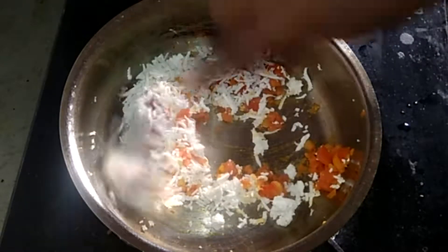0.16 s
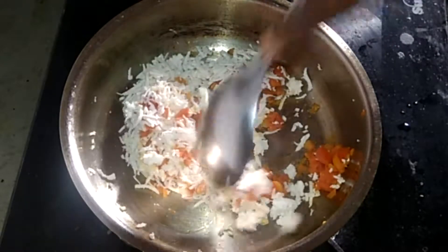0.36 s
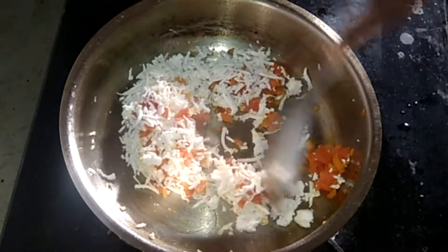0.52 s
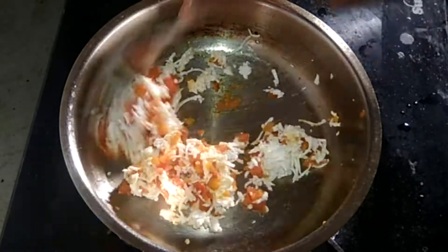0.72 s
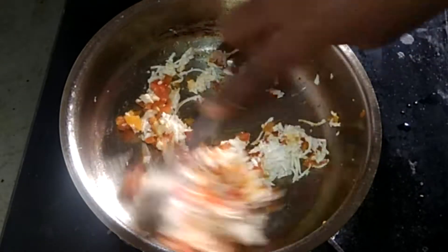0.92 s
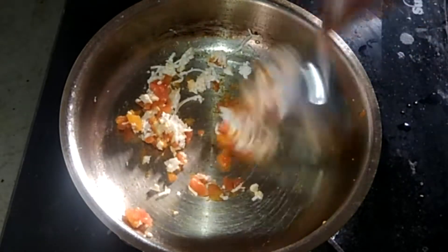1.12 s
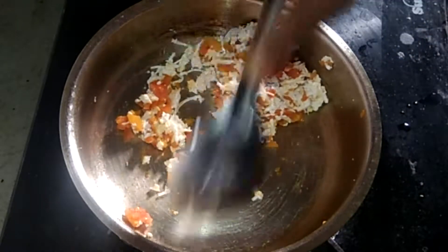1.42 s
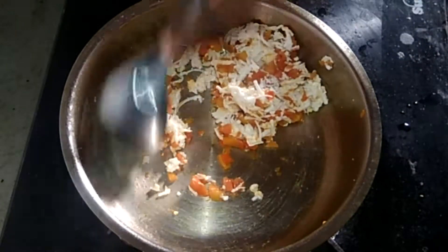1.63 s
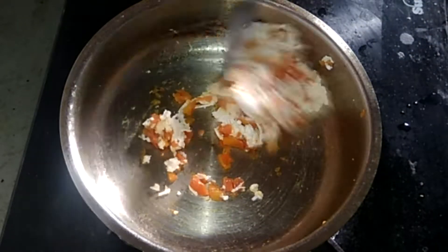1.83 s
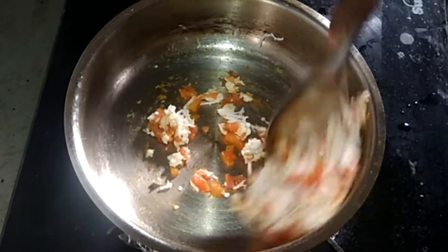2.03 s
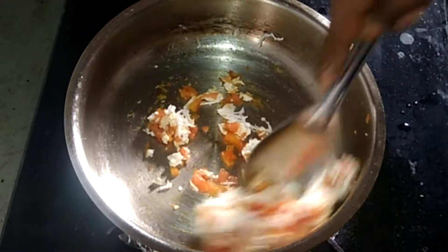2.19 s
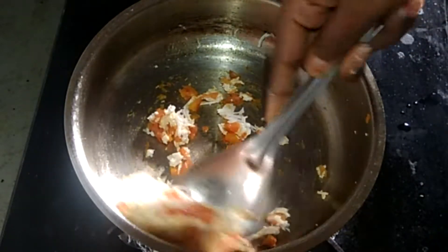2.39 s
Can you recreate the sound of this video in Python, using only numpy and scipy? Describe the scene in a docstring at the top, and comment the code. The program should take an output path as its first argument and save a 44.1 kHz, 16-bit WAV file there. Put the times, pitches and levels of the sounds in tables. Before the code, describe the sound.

Quick metallic scraping and clanking of a spoon stirring food in a steel pan, close up

```python
"""Over a quiet kitchen and a low rumble, a fine hiss on the left (noise and tiny clicks) fades once food is spread.
From 0.2 s a steel spoon strikes and scrapes the floor of a stainless pan in quick strokes, close under a stereo phone:
blows and gritty stick-slip clicks ring the pan's clear modes and its dense thicket of upper modes.
Last, soft wet grains and a dull hum as the food heap is pushed, while the room noise falls away."""
import sys
import numpy as np
from scipy import signal
from scipy.fft import rfft, irfft
from scipy.io import wavfile
from scipy.ndimage import uniform_filter1d

SR = 44100
rng = np.random.default_rng(int(sys.argv[2]) if len(sys.argv) > 2 else 0)


def dump(signal):
    """Clip the signal to [-1, 1] and save it as 16-bit WAV at the path in sys.argv[1]."""
    limited = np.clip(np.atleast_2d(signal).T, -1, 1)
    pcm = np.round(limited * 32767).astype(np.int16)
    wavfile.write(sys.argv[1], SR, pcm)


def ratio(d):
    """dB to gain"""
    e = np.asarray(d, float) / 20
    return 10 ** e


N = 112454

# likeness of the pan's two channels: (frequency [Hz], correlation [-1..1])
PAN_ALIKE = [(60, .7), (300, 1), (640, 0.64), (1400, 0.12), (5000, 0.02), (15000, -0.31)]
# stereo balance of the pan: (frequency [Hz], left over right [dB])
PAN_LR = [(200, 0), (700, -2), (1400, 1.5), (4400, -2.5), (8000, -4.5), (15000, 12.5)]


def at(table, hz):
    """Read (Hz, value) points on a log-frequency axis."""
    points = np.array(table, float)
    return np.interp(np.log(np.maximum(hz, 1)), np.log(points[:, 0]), points[:, 1])


def over_time(table, left=None):
    """Read (s, value) points at every sample."""
    return np.interp(np.arange(N) / SR, *np.array(table, float).T, left=left)


def unit(x):
    """Scale to rms 1."""
    return x / np.sqrt(np.mean(x ** 2))


def decay(t, t60_s):
    """Exponential fall of 60 dB in t60_s."""
    return np.exp(-np.log(1000) * t / t60_s)


def colour(x, table):
    """Filter x by a gain curve of (Hz, dB) points."""
    n = x.shape[-1]
    hz = np.arange(n // 2 + 1) * SR / n
    return irfft(rfft(x) * ratio(at(table, hz)), n)


def stereo(a, b, alike, lr):
    """Mix two unrelated signals as mid and side into a pair of given likeness and balance."""
    n = len(a)
    hz = np.arange(n // 2 + 1) * SR / n
    likeness = np.clip(at(alike, hz), -.98, .98)
    mid = rfft(a) * np.sqrt((1 + likeness) / 2)
    side = rfft(b) * np.sqrt((1 - likeness) / 2)
    left = (mid + side) * ratio(at(lr, hz) / 2)
    right = (mid - side) * ratio(-at(lr, hz) / 2)
    return irfft(np.array([left, right]), n)


def walk(rate):
    """Random levels held 1 / rate s and slewed; spread near 1."""
    hold = int(SR / rate)
    steps = np.repeat(rng.standard_normal(N // hold + 1), hold)
    return np.sqrt(3 / 2) * uniform_filter1d(steps, hold)[:N]


def clicks(per_s, spread_db):
    """Random clicks of either sign, a few much larger: dB excess is exponential."""
    chance, excess, sign = rng.random(N), rng.exponential(size=N), rng.standard_normal(N)
    return (chance < per_s / SR) * np.sign(sign) * ratio(spread_db * excess)


def kitchen():
    """Faint coloured room noise that drops near the end."""
    # (frequency [Hz], density [dB per Hz])
    kitchen_colour = [(30, -43), (380, -6), (550, -50), (1100, -19), (1370, 11), (1900, -24), (2250, -3),
                      (5300, -33.5), (11000, -23), (16000, -20.5)]
    level_db, drop_db, drops_s = -60, -15, 2.24
    noise = colour(rng.standard_normal((2, N)), kitchen_colour)
    pair = stereo(*noise, [(100, .8), (1000, .3), (5000, 0.05)], [(100, 2), (10000, 5)])
    drop = np.clip((np.arange(N) / SR - drops_s) * 20, 0, 1)  # takes 50 ms
    return unit(pair) * ratio(level_db + drop_db * drop)


def hiss():
    """Fine crackly hiss, mostly left: dense clicks plus noise, with a flickering level."""
    # (frequency [Hz], density [dB per Hz])
    hiss_colour = [(100, -63.5), (250, -17.5), (500, -23.5), (800, -14), (2300, -13.5), (4900, -1.5),
                   (9000, -4), (12000, 4), (15500, -6)]
    # (time [s], level of the left-right mean [dB])
    hiss_level = [(0, -32.5), (.5, -32.5), (.72, -33.5), (1.2, -29), (1.5, -59), (2.55, -57)]
    # (frequency [Hz], left over right [dB])
    hiss_lr = [(500, 3), (2000, 3), (5000, 1), (9000, 2), (15000, 20.8)]
    fizz = [colour(unit(clicks(8700, 1.6)) + .5 * rng.standard_normal(N), hiss_colour) for _ in range(2)]
    pair = stereo(*fizz, [(100, 0.51), (1000, 0.31), (5000, 0.054)], hiss_lr)
    mean_rms = np.sqrt(np.mean(pair.mean(axis=0) ** 2))
    return pair / mean_rms * ratio(over_time(hiss_level) + 1.0 * walk(23))


def rumble():
    """Dull low noise through the stove that swells with the strokes."""
    # (time [s], level [dB])
    rumble_level = [(0, -54.5), (.19, -65), (.215, -41.5), (.7, -100), (.74, -48.5), (.88, -60), (1.0, -72),
                    (1.66, -88.5), (1.81, -49), (2.3, -107), (2.45, -63), (2.55, -88)]
    # (frequency [Hz], density [dB per Hz])
    rumble_colour = [(20, -38), (50, -6.5), (100, -11.5), (170, 6), (220, -2), (300, -33.5), (1000, -88.5)]
    noise = colour(rng.standard_normal((2, N)), rumble_colour)
    pair = stereo(*noise, [(50, 0.8), (200, 1.0)], [(50, 0), (200, -0.2)])
    return unit(pair) * ratio(over_time(rumble_level))


def ring(scraped, ring_time_factor):
    """Pan's stereo response to one click: decaying modes and noise, in four bands of energy 1 per channel."""
    # clear modes of pan and spoon: (frequency [Hz])
    mode_hz = [291, 335, 400, 503, 534, 671, 923, 1489, 1640, 1750, 3243, 4116, 5040, 6135, 6495, 7425,
               7795, 8685, 9186, 10360, 11050, 12300]
    # same modes: (struck level [dB], scraped level [dB], t60 before the ring time factor [s])
    mode_table = [(-4, -16, 0.6), (-11.5, -5, 0.14), (-5, -1.5, 0.15), (7.5, -8, 0.23), (-20, -2, 0.22),
                  (3, -1, 0.28), (-17, 4, 0.24), (-3.5, 5, 0.22), (-13, 13, 0.11), (-22, -16.5, 0.82),
                  (-22, 6, 0.23), (-14, 1, 0.45), (-1.5, 6, 0.067), (-8.5, 4, 0.28), (-14.5, 1.5, 0.1),
                  (9, 9, 0.12), (-14.5, 13.5, 0.075), (-1.5, -10, 0.046), (0, 11, 0.089), (-9, 4, .15),
                  (-16, 7, 0.22), (-12, -1.5, 0.16)]
    # dense modes: (frequency [Hz], density [dB per Hz])
    thicket_colour = [(200, -36.5), (300, -10.5), (480, -7), (700, 1.5), (1260, -10.5), (1690, -2.5),
                      (2000, -5.5), (2800, -11), (3300, -1), (3850, -21), (4650, -15), (5050, -4.5),
                      (5750, -13), (6200, -11.5), (6950, -13.5), (7600, -9), (11100, 2), (15700, -16.5)]
    # dense modes: (frequency [Hz], t60 before the ring time factor [s])
    thicket_t60 = [(200, 0.14), (1000, 0.18), (4000, 0.26), (15000, 0.12)]
    # band limits: (deep to low, low to middle, middle to treble [Hz])
    edges_hz = 420, 1200, 4500
    ring_ends_s = .42  # sliding food has stilled any ring by then
    clear_over_dense_db = -5.5 if scraped else -3
    n = int(ring_ends_s * SR)
    t = np.arange(n) / SR

    hz = np.array(mode_hz, float)[:, None]
    struck_db, scraped_db, t60_s = np.array(mode_table, float).T[:, :, None]
    mode_db = scraped_db if scraped else struck_db
    chance = rng.standard_normal((len(hz), 3))
    fall = decay(t, ring_time_factor * t60_s) * ratio(mode_db + 2 * chance[:, :1])
    clear = []
    for k in (1, 2):  # two sets of phases
        tones = fall * np.sin(2 * np.pi * hz * t + np.pi * chance[:, k:k + 1])
        clear.append(unit(tones.sum(axis=0)))

    dense = np.zeros((2, n))
    for centre_hz in 100 * 2 ** np.arange(8):
        octave = [centre_hz / np.sqrt(2), min(centre_hz * np.sqrt(2), SR / 2.2)]
        band = signal.butter(2, octave, "band", fs=SR, output="sos")
        shape = decay(t, ring_time_factor * at(thicket_t60, centre_hz))
        noise = colour(rng.standard_normal((2, n)), thicket_colour)
        dense += signal.sosfilt(band, noise) * unit(shape)

    both = unit(dense) + ratio(clear_over_dense_db) * np.array(clear)
    pair = stereo(*both, PAN_ALIKE, PAN_LR)
    pair = pair * np.clip((ring_ends_s - t) / .04 - .2, 0, 1)  # 40 ms fade-out
    bands = [([250, edges_hz[0]], "band"), (edges_hz[:2], "band"), (edges_hz[1:], "band"), (edges_hz[2], "high")]
    parts = [signal.sosfilt(signal.butter(4, e, kind, fs=SR, output="sos"), pair) for e, kind in bands]
    return [unit(p) / np.sqrt(n) for p in parts]


def blows():
    """Each landing is a knock followed by a short rattle of the spoon, ringing the pan afresh."""
    # (time [s], deep [dB], low [dB], middle [dB], treble [dB], ring time factor [1])
    blow_table = [(.206, -25, -23.5, -22, -16, 1.1), (.345, -33, -37, -59, -24, 0.75),
                  (.733, -31.5, -23, -18.5, -14.5, 0.96), (.993, -63.5, -56, -36.5, -21, 0.41),
                  (1.037, -45, -46.5, -31.5, -20.5, 1), (1.674, -44, -41, -63, -73, 1),
                  (1.805, -30.5, -28.5, -18.5, -19, 0.74), (1.93, -49.5, -34.5, -29, -28, 2.2),
                  (2.082, -48.5, -41.5, -44, -16, 0.71)]
    chatter_s, chatter_per_s, chatter_db = 0.012, 700, -12  # rattle energy re knock
    out = np.zeros((2, N + SR))
    t = np.arange(SR // 10) / SR
    for start_s, *bands_db, ring_time_factor in blow_table:
        rattle = clicks(chatter_per_s, 3.3)[:len(t)] * np.exp(-t / chatter_s)
        force = ratio(chatter_db) * unit(rattle) / np.sqrt(len(t))
        force[0] = 1  # the knock
        body = sum(ratio(db) * part for db, part in zip(bands_db, ring(False, ring_time_factor)))
        # band levels are rms as if the energy filled 17 ms
        sound = np.sqrt(SR * 0.017) * signal.fftconvolve(force[None], body)
        start = int(start_s * SR)
        out[:, start:start + sound.shape[1]] += sound
    return out[:, :N]


def scrape():
    """Grit clicks under the moving spoon drive the same modes, damped by the food; the spot keeps changing."""
    # before a common +1.5 dB: (time [s], treble [dB], middle, low, deep re treble [dB])
    scrape_table = [(.207, -17, -14, -5.5, 2), (0.259, -21, -14, -9.5, -20.5),
                    (.32, -23.5, -13, -15.5, -14), (0.358, -19, -14.5, -20, -20),
                    (.53, -43.5, -11, -14.5, -34), (0.729, -46.5, -7, -52, -50), (0.733, -19, -3, -8, -20),
                    (.775, -21, -6, -2.5, -17.5), (0.818, -21.5, -7.5, -20, -19),
                    (0.858, -26, -14, -15, -24), (.99, -23, -15, -24.5, -38), (1.029, -26, -8, -18, -30.5),
                    (1.036, -15.5, -13, -13, -22.5), (1.09, -24, -11.5, -17.5, -34),
                    (1.12, -16.5, -11, -24, -32.5), (1.238, -25.5, -6, -13.5, -28),
                    (1.34, -42, -6, -11, -23.5), (1.49, -56.5, -6, -18.5, -36),
                    (1.668, -55, -16, -26, -36.5), (1.686, -55, 3.5, 8, 15),
                    (1.721, -23.5, -18.5, -20.5, -21.5), (1.797, -30.5, -23, -20, -21.5),
                    (1.804, -21, -2, -5.5, -20.5), (1.86, -24, -6.5, -6.5, -16),
                    (1.89, -19, -11, -15.5, -40), (1.95, -14.5, -16, -16.5, -29.5),
                    (2.04, -24, -18.5, -19, -23.5), (2.095, -18, -21.5, -27, -34),
                    (2.17, -25.5, -18.5, -23, -23), (2.271, -50, -15, -20, -22)]
    grit_per_s, grit_spread_db, judder_db, judder_per_s = 12000, 2.41, 1, 76
    places, place_s = 4, .07  # spots that ring differently, time from one to the next
    t = np.arange(N) / SR
    time_s, treble, middle, low, deep = np.array(scrape_table, float).T
    judder = ratio(judder_db * walk(judder_per_s)) * (t > time_s[0]) * (t < time_s[-1])
    forces = []
    for band_db in (treble + deep, treble + low, treble + middle, treble):
        gain = ratio(np.interp(t, time_s, band_db) + 1.5)
        forces.append(unit(clicks(grit_per_s, grit_spread_db)) * judder * gain)
    out = 0
    for k in range(places):
        away = np.abs((t / place_s - k + places / 2) % places - places / 2)
        share = np.cos(np.pi / 2 * np.minimum(away, 1))  # crossfade between spots
        for force, part in zip(forces, ring(True, 0.39)):
            out = out + signal.fftconvolve((force * share)[None], part)[:, :N]
    return out


def push():
    """Soft wet grains as the spoon shoves the heap, with a resonant dull hum of one low, damped pan mode."""
    # (frequency [Hz], density [dB per Hz])
    push_colour = [(150, -47), (380, -15.5), (690, -20), (1340, -40), (1680, -13), (2640, -25.5),
                   (3400, -11.5), (6100, -7.5), (6950, -24), (11100, -6.5), (15700, -38)]
    # (time [s], level [dB])
    push_level = [(2.22, -55), (2.27, -45), (2.325, -38.5), (2.395, -44), (2.448, -38.5), (2.51, -48),
                  (2.55, -64)]
    # (time [s], level [dB])
    hum_level = [(2.25, -71), (2.28, -50.5), (2.39, -53.5), (2.5, -86)]
    left_db = 5  # the heap lies to the left; adds to PAN_LR
    hum_hz, hum_width_hz = 511, 21
    grains = [colour(unit(clicks(9000, 2)), push_colour) for _ in range(2)]
    level_db = over_time(push_level, left=-120) + 3.0 * walk(28.16)
    heap = unit(stereo(*grains, PAN_ALIKE, PAN_LR)) * ratio(level_db + left_db * np.array([[.5], [-.5]]))
    resonance = signal.iirpeak(hum_hz, hum_hz / hum_width_hz, fs=SR)
    hum = signal.lfilter(*resonance, rng.standard_normal(N))
    return heap + unit(hum) * ratio(over_time(hum_level, left=-120))


def room_tail(near):
    """Short tiled-room reverberation: convolution with decaying coloured noise."""
    room_db, room_t60_s = -14, 0.22
    t = np.arange(SR // 2) / SR
    noise = colour(rng.standard_normal((2, len(t))), [(100, -23.5), (2000, -10), (15000, -1.5)])
    tail = noise * decay(t, room_t60_s) * (t > .005)
    tail = stereo(*tail, PAN_ALIKE, [(100, 0.0026), (15000, 0.0039)])
    room = signal.fftconvolve(near, unit(tail) / np.sqrt(len(t)), axes=1)[:, :N]
    return ratio(room_db) * room


def scene():
    """Pan sounds with their room tail, plus the backgrounds."""
    near = blows() + scrape() + push()
    return near + room_tail(near) + hiss() + kitchen() + rumble()


def band_limit(x):
    """A steep low-pass at the top of the band."""
    return signal.sosfilt(signal.butter(12, 17000, fs=SR, output="sos"), x)


def record(dry):
    """The phone cuts the deep bass and the top, and clips at full scale."""
    x = signal.sosfilt(signal.butter(2, 60, "high", fs=SR, output="sos"), dry)
    x = signal.sosfilt(signal.ellip(10, .3, 60, 15750, fs=SR, output="sos"), x)
    mix = np.clip(x, -1, 1)
    return band_limit(mix)


dry = scene()
out = record(dry)
dump(out)
```